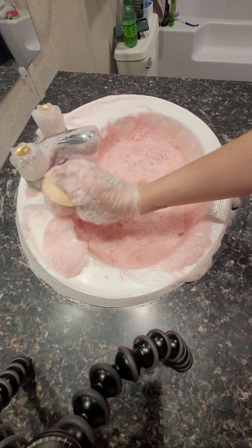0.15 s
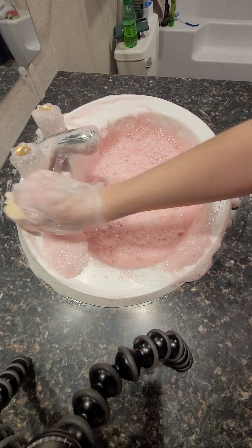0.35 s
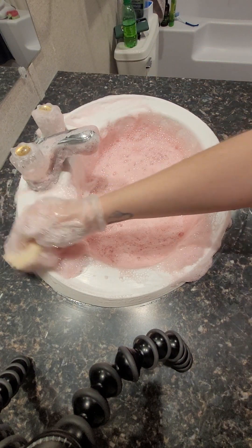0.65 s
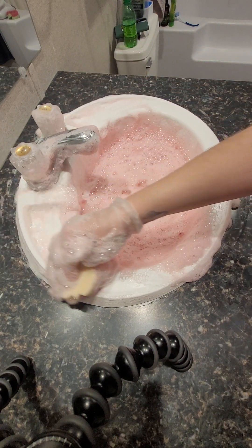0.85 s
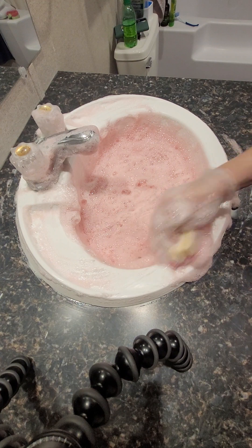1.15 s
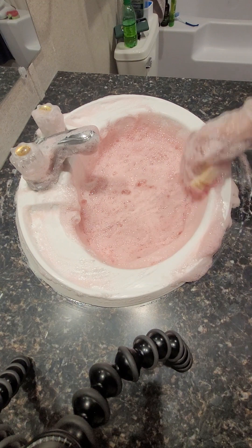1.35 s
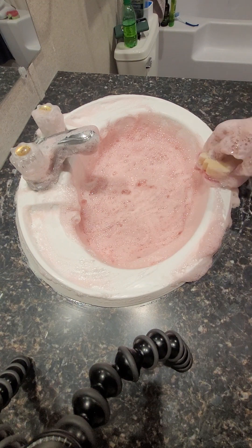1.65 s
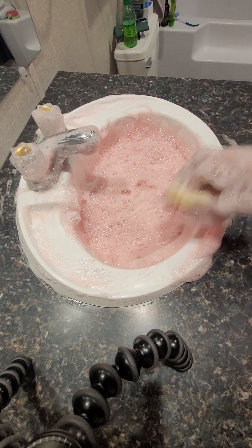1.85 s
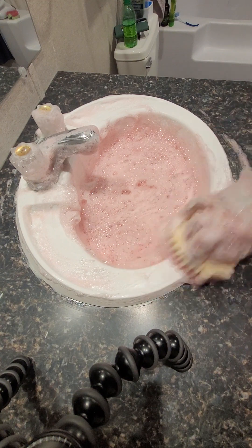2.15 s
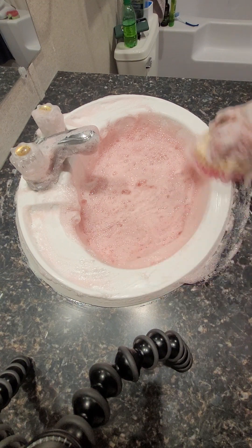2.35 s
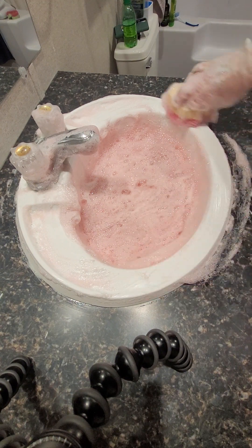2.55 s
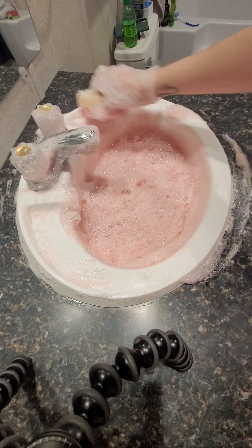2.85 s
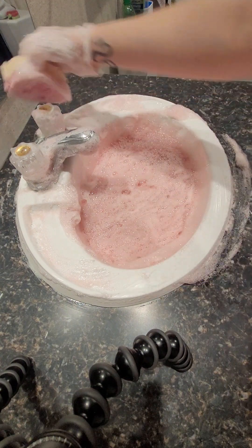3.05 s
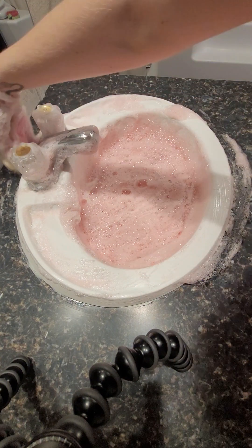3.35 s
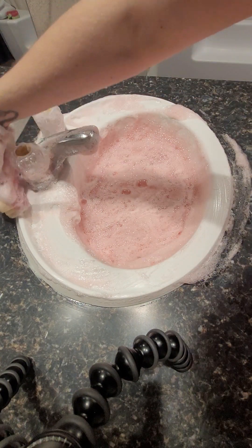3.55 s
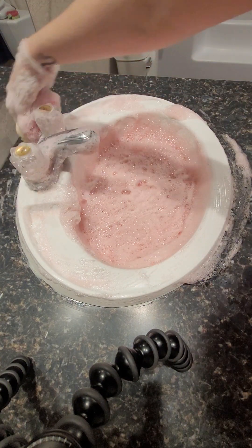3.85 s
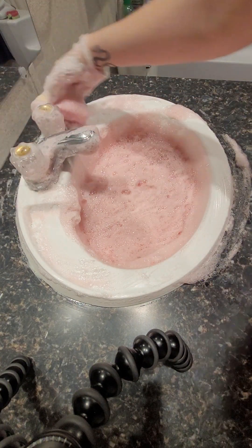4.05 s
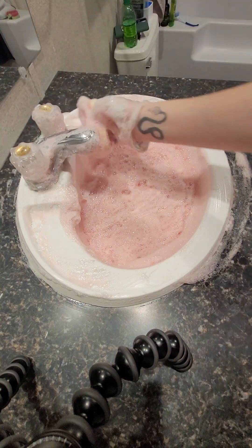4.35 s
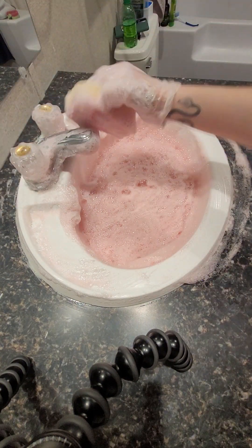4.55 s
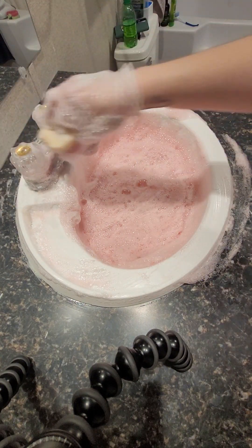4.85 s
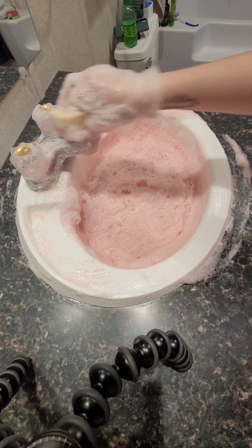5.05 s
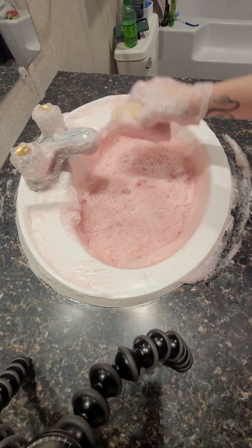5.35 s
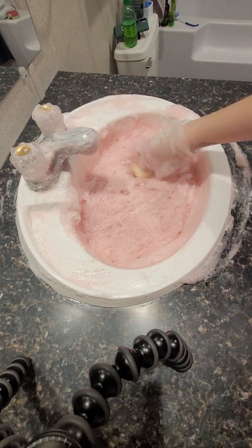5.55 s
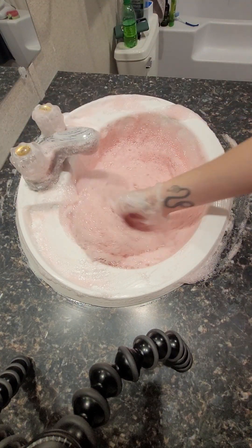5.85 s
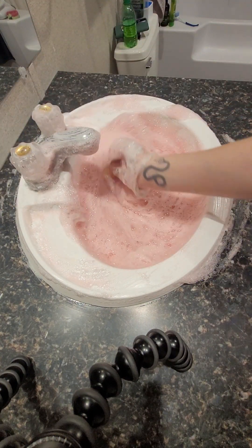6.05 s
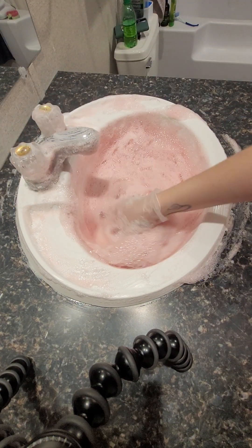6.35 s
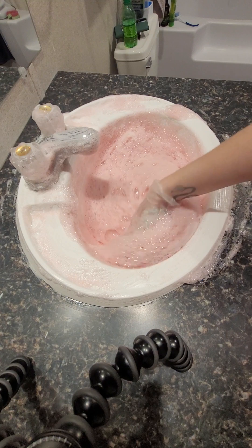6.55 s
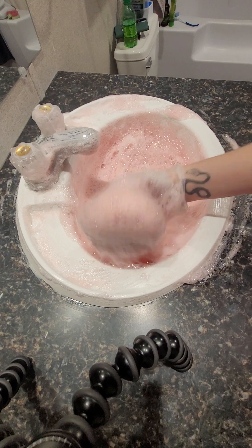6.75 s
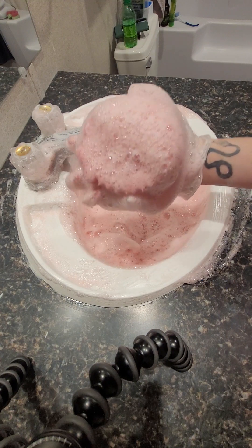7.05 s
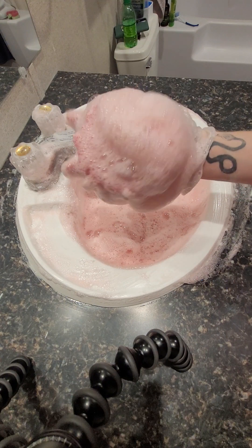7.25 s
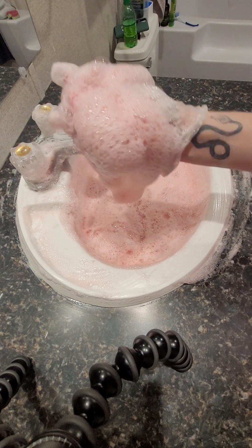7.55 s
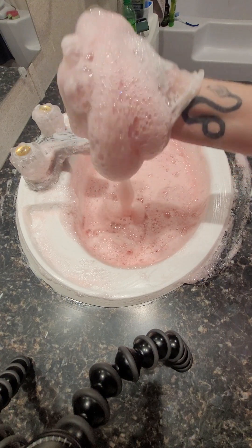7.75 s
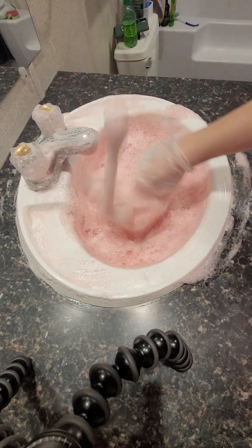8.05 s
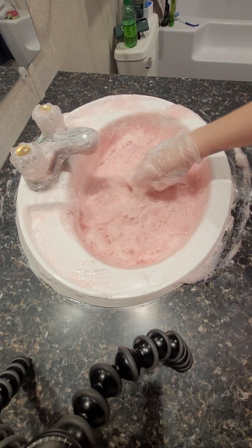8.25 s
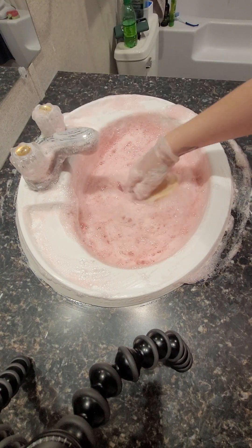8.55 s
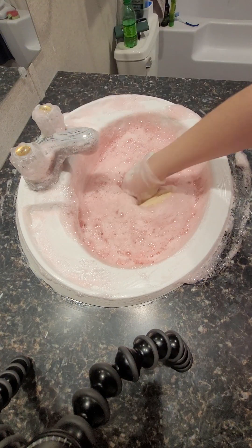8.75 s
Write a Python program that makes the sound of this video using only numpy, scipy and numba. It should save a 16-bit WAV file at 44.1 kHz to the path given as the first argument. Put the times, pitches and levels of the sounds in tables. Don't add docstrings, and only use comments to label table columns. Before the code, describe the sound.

A soapy sponge rubs and bumps around a sink rim, bubbles crackling densely, before hushed stirring, wet gurgling foam and one soft splat.

```python
import sys
import numpy as np
from scipy import signal
from scipy.fft import rfft, irfft
from scipy.io import wavfile
from scipy.ndimage import uniform_filter1d
from numba import njit

SR = 44100
rng = np.random.default_rng(int(sys.argv[2]) if len(sys.argv) > 2 else 0)


def voltage_ratio(decibels):
    exponent = np.asarray(decibels, float) / 20
    return 10 ** exponent


def file_out(sig):
    cols = np.atleast_2d(sig).T
    lim = np.clip(cols, -1, 1)
    pcm = np.round(lim * 32767).astype(np.int16)
    wavfile.write(sys.argv[1], SR, pcm)


N = 392040
TIME = np.arange(N) / SR

# lowest and highest pitch in Hz, bursts a second, length in cycles, size scatter in dB.
BUBBLES = [
    (2656, 10460, 14000, 0.59, 2.5),
    (552, 1260, 1500, 0.63, 2),
    (1500, 2970, 3500, 0.39, 2),
    (8280, 20600, 14000, 0.45, 2),
]
CRACKLE = (1300, 5400, 340, 0.73, 1.6)
# time in seconds, left minus right in dB, lead of the left port in samples.
HAND = [(0.0, -9, 7.6), (2.35, -5.5, 7.4), (3.07, -8.5, 11.9), (5.82, -9, 10.1), (5.92, -10.5, 11),
        (6.83, -13, 8.3), (7.03, -8.5, 14.5), (8.12, -6, 8.3), (8.89, -11.5, 11)]
# pitch in Hz, gain in dB.
BOWL_AIR = [(60, 0.5), (640, -3), (750, 0), (880, -2.5), (1400, 1), (15000, -1)]

# time in seconds, squeeze in dB,
# coarseness in dB (big bubbles over fine ones).
FRONT_RIM = [
    [(0.0, -45.5, 4), (0.016, -61, 3), (0.044, -57.5, 6.5), (0.072, -54, 7), (0.124, -66, 6),
     (0.168, -65, 0), (0.19, -57, 3)],
    [(0.228, -46.5, 1), (0.31, -55, 7.5), (0.522, -42, -3.5), (0.592, -49.5, 1), (0.654, -44, -2.5),
     (0.664, -50.5, 1.5), (0.75, -53, 3.5)],
    [(0.8, -57.5, 7), (0.85, -53.5, 5.5), (1.03, -53.5, 3), (1.182, -47.5, 2), (1.208, -50.5, 8),
     (1.262, -49, -1), (1.33, -50, -1.5), (1.472, -53.5, -2.5), (1.52, -59.5, -1.5)],
    [(1.56, -62.5, 1.5), (1.64, -51, -10.5), (1.778, -63.5, 2.5), (1.836, -52.5, -5), (1.934, -66, -3),
     (1.99, -65.5, -9), (2.07, -65.5, -19)],
]
BACK_RIM = [
    [(2.113, -50, 5.5), (2.127, -56.5, 7.5), (2.299, -54.5, -0.5), (2.361, -51, -4), (2.587, -49, -8),
     (2.903, -51.5, -2.5), (2.925, -57.5, -0.5), (3.039, -72, -0.5), (3.219, -74.5, -12), (3.25, -77, -16)],
    [(3.287, -67, -16), (3.299, -47, -15), (3.307, -61, -6), (3.311, -48.5, 7), (3.321, -50.5, 4.5),
     (3.431, -47.5, -2.5), (3.451, -52, 6.5), (3.659, -50, -2.5), (3.7, -61, 2.5)],
    [(3.73, -57.5, 12), (3.74, -45.5, -3), (4.22, -52, -2.5), (4.256, -50.5, -5.5), (4.34, -56, -2.5),
     (4.38, -56.5, 6.5), (4.448, -59.5, -3), (4.48, -58, -1), (4.64, -72, -4)],
]
TAP = [
    [(4.682, -51.5, -4), (4.714, -64, -2.5), (4.78, -53.5, -2), (4.864, -46, -1), (4.898, -59.5, 5),
     (4.928, -43.5, -10), (4.938, -52.5, 4.5), (5.034, -47.5, -3.5), (5.07, -56, -11)],
    [(5.1, -55.5, -5), (5.202, -51.5, -1), (5.226, -53.5, -4.5), (5.348, -51.5, -6), (5.356, -48, 7.5),
     (5.37, -48.5, 0.5), (5.48, -72.5, 2), (5.57, -72.5, -3)],
]
BOWL_FOAM = [
    [(5.61, -70, -7), (5.78, -75.5, -9), (5.836, -84, -5), (5.86, -78, -0.5), (6.028, -77, -20),
     (6.058, -76.5, -7), (6.205, -74.5, -11)],
    [(6.252, -64, -5), (6.267, -66.5, 0.5), (6.639, -76, -12), (6.791, -90, -7), (6.819, -77.5, -8.5),
     (7.071, -85, -7.5), (7.25, -84, -1)],
    [(7.28, -85, -7), (7.326, -68, -2), (7.418, -57, 3), (7.55, -54.5, 4.5), (7.6, -51.5, -1.5),
     (7.684, -48, -3), (7.812, -48.5, 5), (8.072, -62.5, 6), (8.13, -68, 0.5)],
]
DROP = [
    [(8.168, -68, 5), (8.178, -47, 1.3), (8.186, -55, 1), (8.194, -48.5, 2), (8.203, -59, 3),
     (8.235, -69, 5.2)],
]
SETTLE = [
    [(8.244, -66, 5), (8.26, -58, 9.5), (8.285, -59.5, 5), (8.3, -57, 1), (8.5, -65, -11),
     (8.716, -70, -11), (8.776, -78, -25), (8.784, -78, -11), (8.89, -89, -12)],
]
# squelching pockets in dB, finest mist in dB, grip on the basin in dB.
WETNESS = [(1.5, -8, 2.5), (-5, -5, 4), (-2.5, 3, -4), (-1, -5.5, -2.5), (-1.5, 1.5, 0), (1.5, -3.5, 5.5),
           (0.5, -5.5, 4), (-1, -1, 6.5), (1, -3.5, 10), (9, -5, 21.5), (6, -4.5, 5), (2.5, -28, 2.5),
           (9.5, -7.5, 2), (6, -10, 2.5)]
POCKET_SLOPE, COARSE_SLOPE, MIST_SLOPE, COARSE_DB = 0.62, 1.14, -0.19, -2

# pitch in Hz, level in dB, time to fall 60 dB in seconds.
BODIES = [
    [(239, -18, 0.08), (258, 0.5, 0.12), (320, 1, 0.064), (387, -16.5, 0.016), (459, -9.5, 0.075)],
    [(46.2, 0, 0.25), (53.8, 6, 0.31), (63, -7, .2)],
    [(125, 6.5, 0.17), (128.7, -1, 0.09)],
    [(176, 0, 0.26), (227, -3.5, .2)],
]
# pitch in Hz, level in dB, time to fall 60 dB in seconds.
GLAZE = [(540, -6.5, 0.015), (770, -34, 0.061), (900, -13, 0.065), (1290, -23, 0.026)]
# time in seconds, peak in dB, favoured pitch in Hz, upper modes over it in dB.
BUMPS = [(0.223, -52, 320, -26), (0.636, -25.5, 325, -26), (1.261, -39.5, 258, -1), (2.114, -20, 195, -18),
         (2.695, -48, 137, -13), (3.322, -38.5, 258, 7.5), (3.754, -35, 258, -22), (3.88, -31.5, 176, -1),
         (4.681, -31, 305, -29), (5.14, -32, 132, -23), (5.395, -39.5, 134, -20), (5.605, -57, 263, -12),
         (5.727, -40, 366, -8), (5.93, -39, 246, -25), (6.242, -35, 332, -16), (6.263, -40, 288, 3),
         (6.35, -38, 262, -13), (6.697, -49, 261, -29), (8.162, -53.5, 345, 8), (8.175, -26, 280, -16),
         (8.184, -36, 125, -23)]
# start in seconds,
# hold in seconds, level in dB, favoured pitch in octaves over the stand.
RUBS = [(0, 0.042, -56.5, 1.5), (0.21, 0.034, -45.5, 2.04), (0.372, 0.1, -48, 1.85),
        (0.474, 0.036, -38.5, .3), (.46, 0.057, -49, 1.5), (0.608, 0.065, -44.5, 0.96),
        (0.726, 0.016, -70, .1), (1.12, 0.031, -51, 0.43), (1.256, 0.059, -54, 1.96),
        (1.36, 0.18, -57.5, 1.76), (1.875, 0.029, -56.5, 1.68), (2.115, 0.024, -40.5, 1.5),
        (2.166, 0.038, -49.5, 1.4), (2.673, 0.12, -54, 1.74), (2.807, 0.11, -50.5, 1.7),
        (3.309, 0.026, -44, 1.64), (3.487, 0.12, -47.5, 2.2), (3.617, 0.049, -45.5, 1.6),
        (3.753, 0.086, -43.5, 1.87), (3.896, 0.05, -41, 1.6), (3.99, 0.065, -48.5, 1.1),
        (4.496, 0.022, -56.5, 1.23), (4.689, 0.052, -47, 1.53), (4.777, 0.11, -43.5, .2),
        (4.779, 0.085, -44, 1.9), (4.948, 0.2, -49, 1.18), (5.117, 0.037, -44, 1.7),
        (5.199, 0.073, -47, 1.22), (5.366, 0.074, -42, 2.88), (2.688, 0.02, -50, 2.1),
        (7.428, .03, -58, 2.3), (7.5, 0.077, -53.5, 2.35), (7.732, .02, -60, 3.2),
        (7.795, 0.12, -55, 2.4),
        (5.609, 0.0053, -52.5, 1.94), (5.72, 0.035, -55, 2.3), (5.93, 0.028, -54.5, 1.85),
             (6.13, 0.06, -59, 2.15), (6.245, 0.017, -43.5, 2.15), (6.33, 0.17, -55.5, 2.1),
             (6.55, 0.069, -64.5, 2), (6.7, 0.042, -65.5, 1.8), (6.8, 0.035, -59, 0.11),
             (7.18, 0.042, -66, .1), (7.86, 0.036, -73, .3), (8.176, 0.013, -44, 1.91),
             (8.21, 0.089, -43.5, 1.1), (8.55, 0.1, -64.5, 2.17)]
BODY_OCTAVES = [2.02, 0.13, 1.56, 1.52]
BODY_RUB_DB = [1.4, 2.5, 0.35, 2.7]
SLIDE_DB = [-6, -16, -16.5, -26.5]
OFF_PITCH_DB = [12.2, 4.3, 28, 120]
RUB_RISE_DB_S, RUB_FALL_DB_S, OFF_PITCH_MOST_DB = 1309, 332, 14.5
# time in seconds, peak in dB, pitch in Hz, length in cycles.
JUDDERS = [(.505, -33, 56, 0.7), (1.262, -44.5, 260, 3.1), (1.29, -47, 266, 2.9), (2.115, -30, 239, 0.89),
           (2.126, -30, 147, 1.4), (2.148, -31.5, 189, 1.4), (2.175, -35, 184, 1.3), (2.2, -45, 168, 1.8),
           (3.325, -36, 261, 3.5), (3.33, -34, 427, 2.2), (3.36, -39, 171, 2.4), (3.625, -41, 227, 2.6),
           (3.755, -34, 255.3, 5.4), (3.78, -33, 125, 1.6), (3.885, -30.5, 176, 3.6),
           (3.915, -36, 175.7, 2.2), (3.942, -31, 162, 1.1), (3.9, -46.5, 597, 6), (3.945, -45, 616, 4),
           (4.688, -37, 292, 1.7), (4.8, -39, 285, 3), (4.858, -35, 274, 2), (5.135, -32.5, 309, 1.9),
           (5.27, -43, 135, 3), (5.36, -38.5, 275, 2), (5.385, -37.5, 266, 3.4), (5.398, -39.5, 192, 0.9),
           (5.414, -44, 168, .8), (5.614, -44, 271, 1.4), (6.25, -38, 320, 1.4), (4.86, -42.5, 150, 2),
           (5.726, -44.5, 330, 1.4), (5.933, -46.5, 233, 1.5), (2.7, -41, 148, 2.3),
           (8.229, -40, 230, 0.55), (8.29, -44, 110, 0.93), (7.54, -47.5, 290, 2.7), (7.732, -44, 248, 1.2),
           (7.855, -46, 275, 1.6), (8.2195, -36, 190, 0.43), (8.245, -39, 200, 0.44)]

# time in seconds, peak in dB, pitch in Hz.
TICKS = [(0.384, -36, 2820), (2.525, -36, 7800), (2.5504, -36, 7830), (3.0144, -48, 5070),
         (3.0999, -52, 5030), (3.1474, -54, 3820), (3.2321, -63, 3720), (3.8272, -31, 5120),
         (4.2679, -36.5, 3510), (5.5199, -53, 3780), (5.8636, -61, 3810), (7.4394, -41, 3630),
         (7.5144, -41, 3790), (7.667, -31.5, 3570), (8.8054, -69, 4210)]
TICK_DB, TICK_CYCLES = 5, .35
# start in seconds, length in seconds, pitch in Hz, level of a bubble in dB.
SWISHES = [
    (.643, 0.0182, 4600, -44.5),
    (4.214, .09, 8530, -46),
    (1.25, 0.07, 840, -55.5),
    (7.4, 0.54, 710, -67),
    (7.76, 0.36, 797, -60),
]
# start in seconds, length in seconds, pitch in Hz,
# level of a bubble in dB.
JETS = [(2.308, .12, 10800, -42.5), (2.502, .12, 8100, -48.5), (2.582, .2, 3800, -63),
        (7.773, .14, 386, -63), (3.119, 0.18, 560, -77.5), (3.862, 0.23, 7100, -54),
        (3.448, .13, 630, -56.5), (3.525, .05, 990, -57), (4.76, .1, 3700, -62), (4.941, .08, 3770, -60),
        (4.978, .06, 734, -75), (5.31, .04, 3700, -60), (7.784, .17, 1150, -54)]
PORE_SPREAD_OCTAVES = .26
# start in seconds, length in seconds, first and last pitch in Hz,
# spread in octaves, length of a bubble in cycles.
SLURP = (1.05, .195, 3400, 1400, 1.1, 1.4)
SLURP_DB, SLURP_SWELL_DB = -51.5, 6
# time in seconds, pitch in Hz, level in dB.
GULP = [(1.18, 1380, -67), (1.195, 1277, -43), (1.21, 1100, -41.5), (1.223, 950, -40), (1.228, 874, -35),
        (1.235, 823, -36.5), (1.248, 725, -40), (1.258, 700, -68)]
# time in seconds, peak
# in dB, pitch in Hz, length in cycles.
PLOPS = [(1.196, -38, 1820, 3), (1.207, -41, 1930, 3), (1.213, -41, 2400, 3), (2.113, -39, 1410, 2.6),
         (3.3105, -17, 13500, .8), (5.3558, -24, 2890, 1.9), (5.3558, -29, 1290, 1.1),
         (5.3558, -36, 5000, 0.9), (5.5195, -59, 3620, 1), (5.932, -53, 560, 0.67), (6.248, -50, 810, 1.4),
         (7.365, -50, 1000, 0.97), (7.454, -47, 760, 2.2), (7.52, -48, 760, 3.3), (7.732, -42, 996, 1.5),
         (7.786, -43, 736, 3.7), (7.805, -33, 1470, 1.9), (7.757, -37, 1570, 2.3), (7.825, -48, 1300, 2.5),
         (7.84, -36, 1500, 2.2), (7.835, -45, 750, 2.7), (7.866, -38, 970, 2.5), (7.875, -41.5, 736, 5.2),
         (7.918, -35, 793, 2.2), (7.981, -38.5, 950, 2.1), (8.04, -52, 750, 2.6), (8.162, -45, 800, 0.65),
         (8.176, -24.5, 227, 0.27), (8.183, -24, 136, 0.21), (8.1915, -27.5, 410, 0.21),
         (8.211, -33, 190, 0.3), (8.263, -43, 900, 1.1), (8.305, -42.5, 690, 0.93)]
# time in seconds, peak in dB, pitch in Hz.
POPS = [(2.1133, -42, 1520), (3.1428, -48, 3750), (4.6803, -51, 5000), (4.9232, -47, 5170),
        (5.3564, -21, 3600), (5.52, -41.5, 3800), (5.6111, -44, 3800), (5.674, -43, 4080),
        (7.3285, -57.5, 3780), (7.365, -35.5, 3000), (7.735, -29, 1700), (7.64, -29, 3730),
        (8.305, -35, 3700), (8.551, -40, 3900), (8.177, -26.5, 3620), (8.1925, -28, 3460),
        (8.2582, -46, 2650), (8.5044, -38, 3560)]
# time in seconds, peak in dB, pitch in Hz.
SNAP = [
    (3.3103, -25, 4960),
    (3.3104, -13.5, 9050),
]
SNAP_LEFT_DB, SNAP_SPREAD_OCTAVES, SNAP_CYCLES = -5, .3, .7

# pitch in Hz, level in dB per Hz.
HOUSE_AIR = [(15, -24.5), (25, 6.5), (631, 2), (703, 6), (970, -8.5), (1170, -8.5), (2010, -25.5),
             (3830, -32.5), (6210, -39), (7300, -22), (15500, -31)]
AIR_DB, ROOM_T60_S, ROOM_DB = -71, .22, -11
# pitch in Hz, gain in dB.
LEFT_PORT = [(40, -7), (130, -4), (700, -1.5), (2000, -2), (4000, -6.5), (5300, -5), (6000, -10),
             (6700, -6), (7900, -8.5), (8700, -12.5), (12000, -8.5), (15500, -11.5)]
# pitch in Hz, gain in dB.
RIGHT_PORT = [(40, -0.5), (130, -1.1), (1500, 0), (3250, 5), (3700, 10.5), (4250, 4.5), (5100, 7.5),
              (5450, 4.5), (5750, 0.5), (6250, 0.5), (7000, 5.5), (8000, 3.5), (9500, -5), (10800, -0.5),
              (11500, -0.5), (11800, -5), (15500, -17)]
TOP_HZ = 15750


def curves(table):
    s, *columns = np.transpose(table)
    return [np.interp(TIME, s, c) for c in columns]


def colour(x, points):
    hz, db = np.transpose(points)
    bins = np.arange(2049) * SR / 4096 + 1
    cepstrum = irfft(np.log(voltage_ratio(np.interp(np.log(bins), np.log(hz), db))))
    cepstrum[1:2048] *= 2
    cepstrum[2049:] = 0
    return signal.fftconvolve(x, irfft(np.exp(rfft(cepstrum))))[:N]


def ports(x):
    return np.array([colour(x[0], LEFT_PORT), colour(x[1], RIGHT_PORT)])


def walk(rate):
    k = int(SR / rate)
    held = np.repeat(rng.standard_normal(N // k + 1), k)
    return 1.3 * uniform_filter1d(uniform_filter1d(held, k), k)[:N]


def slips(rate, fade_s):
    kicks = (rng.random(N) < rate / SR) * rng.random(N)
    fading = signal.lfilter([1], [1, -np.exp(-1 / (fade_s * SR))], kicks)
    surge = uniform_filter1d(fading, 150)
    return (surge - surge.mean()) / surge.std()


@njit
def bursts(at, hz, size, cycles):
    out = np.zeros(N + 8000)
    for k in range(len(at)):
        i, tau = int(at[k]) + 1, cycles * SR / hz[k]
        s = complex(-1 / tau, 2 * np.pi * hz[k] / SR)
        t, step = i - at[k], np.exp(s)
        z = size[k] * np.e / tau * np.exp(s * t)
        for j in range(int(8 * tau)):
            out[i + j] += (t + j) * z.imag
            z *= step
    return out[:N]


def cluster(start_s, length_s, hz, db, lag, spread, cycles, count):
    u = rng.random((count, 3)).T
    at = (start_s + length_s * (np.arange(count) + u[0]) / count) * SR
    pitch = np.minimum(hz * 2 ** (spread * (u[1] - .5)), .36 * SR)
    swell = np.sqrt(np.sin(np.pi * (np.arange(count) + 1) / (count + 1)))
    size = voltage_ratio(db) * swell * np.sign(u[2] - .5)
    left = bursts(at - lag[int(at[0])], pitch, size, cycles)
    return np.array([left, bursts(at, pitch, size, cycles)])


def strokes(tables):
    rows = [tuple(row) for table in tables for row in table]
    for before, after in zip(tables, tables[1:]):
        rows.append((after[0][0] - .011, *before[-1][1:]))
    return curves(sorted(rows))


def lather():
    tables = FRONT_RIM + BACK_RIM + TAP + BOWL_FOAM + DROP + SETTLE
    return strokes([[(*row, *wet) for row in table] for table, wet in zip(tables, WETNESS)])


def foam(lag):
    fine_db, coarse_db, pocket_db, mist_db, _ = lather()
    pockets = pocket_db + POCKET_SLOPE * coarse_db
    coarse = COARSE_DB + COARSE_SLOPE * coarse_db
    mist = mist_db + MIST_SLOPE * coarse_db
    levels = [0, pockets, coarse, mist, coarse - 5.5]
    out, surge = 0, .6 * slips(22, .03)
    for (lo, hi, rate, cycles, scatter_db), over_db in zip(BUBBLES + [CRACKLE], levels):
        u = rng.random((int(rate * N / SR), 5)).T
        at = u[0] * (N - 200) + 100
        hz = lo * (hi / lo) ** u[1]
        size = voltage_ratio(-scatter_db * np.log(1.002 - u[2])) * np.sqrt(hz) * np.sign(u[3] - .5)
        own_lag = lag[at.astype(int)] + np.clip(2.5 * np.tan(np.pi * (u[4] - .5)), -60, 60)
        pair = ports([bursts(at - own_lag, hz, size, 1. * cycles), bursts(at, hz, size, 1. * cycles)])
        level_db = fine_db + over_db + surge + 1.47 * walk(25) - 2.5
        out = out + pair / pair.mean(0).std() * voltage_ratio(level_db)
    return np.array([colour(side, BOWL_AIR) for side in out])


def drag():
    squeeze_db, coarse_db, *_, grip_db = lather()
    power = [voltage_ratio(2 * (squeeze_db + 0.39 * coarse_db + grip_db + db)) for db in SLIDE_DB]
    for start, hold, db, octave in RUBS:
        rise_db = RUB_RISE_DB_S * (TIME - start)
        fall_db = RUB_FALL_DB_S * (start + hold - TIME)
        shape = voltage_ratio(2 * np.minimum(np.minimum(rise_db, fall_db), 0))
        for k, body_octave in enumerate(BODY_OCTAVES):
            loss_db = min(OFF_PITCH_DB[k] * (octave - body_octave) ** 2, OFF_PITCH_MOST_DB)
            power[k] = power[k] + shape * voltage_ratio(2 * (db + BODY_RUB_DB[k] - loss_db))
    return [10 * np.log10(p) for p in power]


def struck(db, contact_s):
    blows, contact = np.zeros(N), np.hanning(int(contact_s * SR))
    blows[(np.transpose(BUMPS)[0] * SR).astype(int)] = voltage_ratio(db)
    return np.convolve(blows, contact / contact.sum())[:N]


def ring(push, hz, t60):
    pole = np.exp((2j * np.pi * hz - np.log(1000) / t60) / SR)
    return signal.lfilter([1], [1, -pole], push).imag


def counter():
    (_, db, hz, upper_db), drags = np.transpose(BUMPS), drag()
    out, stutter = 0, 1.5 * slips(20, .03)
    for modes, drag_db in zip(BODIES, drags):
        body = 0
        for mode_hz, mode_db, t60 in modes:
            even = np.sqrt(4 * np.log(1000) / (t60 * SR))
            rub = rng.standard_normal((2, N)) * voltage_ratio(drag_db - 5.0 + stutter) * even
            blow = struck(db - 7.0 - np.minimum(25 * np.log2(mode_hz / hz) ** 2, 27), 0.0025)
            body = body + voltage_ratio(mode_db) * ring(rub + blow * [[1], [0]], mode_hz, t60)
        low_cut = signal.butter(2, .8 * modes[0][0], "high", fs=SR, output="sos")
        out = out + signal.sosfilt(low_cut, body)
    scrape = voltage_ratio(drags[0] - 29 + stutter)
    for mode_hz, mode_db, t60 in GLAZE:
        push = struck(db + upper_db + 15.5, 0.0024) + scrape * rng.standard_normal(N)
        out[0] += voltage_ratio(mode_db) * ring(push, mode_hz, t60)
    common, unlike = out
    return ports([common + voltage_ratio(-8.0) * unlike, common - voltage_ratio(-18.0) * unlike])


def air():
    shared, left, right = (colour(rng.standard_normal(N), HOUSE_AIR) for _ in range(3))
    pair = np.array([left, right]) + 0.99 * shared
    return pair / pair.mean(0).std() * voltage_ratio(AIR_DB + 2.0 * walk(2.44))


def tiles(x, t60):
    t = np.arange(SR // 2) / SR
    tail = rng.standard_normal((2, len(t))) * voltage_ratio(-60 * t / t60) * (t > .0015)
    tail = tail / np.sqrt((tail ** 2).sum(1, keepdims=True))
    return signal.fftconvolve(x, tail, axes=1)[:, :N]


def plops(table, lag):
    left, right = np.zeros(N), np.zeros(N)
    for s, db, hz, cycles in table:
        at, pitch, size = np.array([s * SR]), np.array([1. * hz]), voltage_ratio([db])
        left += bursts(at - 0.98 * lag[int(s * SR)], pitch, size, 1. * cycles)
        right += bursts(at, pitch, size, 1. * cycles)
    return ports([left, right])


def ticks(lag):
    return plops([(s, db + TICK_DB, hz, TICK_CYCLES) for s, db, hz in TICKS], lag)


def judders():
    return plops(JUDDERS, np.zeros(N))


def pore_streams(table, lag, cycles):
    return ports(sum(cluster(s, length, hz, db, lag, PORE_SPREAD_OCTAVES, cycles, count=int(2500 * length))
                     for s, length, hz, db in table))


def slurp(lag):
    s, length, from_hz, to_hz, spread, cycles = SLURP
    share = np.linspace(0, 1, 700) ** 2
    hz = from_hz * (to_hz / from_hz) ** share
    return ports(cluster(s, length, hz, SLURP_DB + SLURP_SWELL_DB * share, lag, spread, cycles, count=700))


def gulp():
    hz, db = curves(GULP)
    phase = 2 * np.pi * np.cumsum(hz * (1 + .045 * walk(400))) / SR
    sounding = (TIME > GULP[0][0]) & (TIME < GULP[-1][0])
    overtone = .4 * voltage_ratio(1.5 * walk(300)) * (np.sin(2 * phase) + .4 * np.sin(3 * phase))
    return voltage_ratio(db + 1.7 * walk(200)) * sounding * (np.sin(phase) + overtone)


def pops(lag):
    return ports(sum(cluster(s, 0.00091, hz, db - 9.0, lag, 0.8, 0.37, count=4) for s, db, hz in POPS))


def snap(lag):
    pair = sum(cluster(s, .0009, hz, db, lag, SNAP_SPREAD_OCTAVES, SNAP_CYCLES, count=3) for s, db, hz in SNAP)
    return ports(pair * voltage_ratio([[SNAP_LEFT_DB], [0]]))


def scene():
    pan_db, lag = curves(HAND)
    pan_db = pan_db - pan_db.mean()
    near = foam(lag) * voltage_ratio(np.array([pan_db, -pan_db]) / 2)
    near = near + ticks(lag) + pore_streams(SWISHES, lag, 2.5) + slurp(lag) + gulp()
    near = near + plops(PLOPS, lag) + pops(lag) + pore_streams(JETS, lag, 1.96) + snap(lag)
    solid = counter() + judders()
    return near + solid + voltage_ratio(ROOM_DB) * tiles(near, ROOM_T60_S) + air()


def top_cut(x):
    return signal.sosfilt(signal.butter(12, 16640, fs=SR, output="sos"), x)


def record(dry):
    x = signal.sosfilt(signal.butter(3, 36, "high", fs=SR, output="sos"), dry)
    x = signal.sosfilt(signal.ellip(10, .3, 60, TOP_HZ, fs=SR, output="sos"), x)
    return top_cut(x)


dry = scene()
out = record(dry)
file_out(out)
```